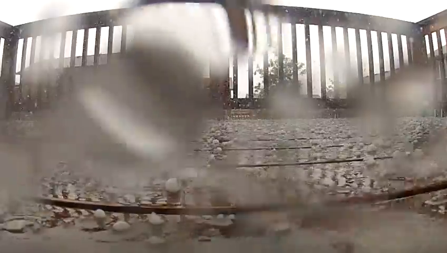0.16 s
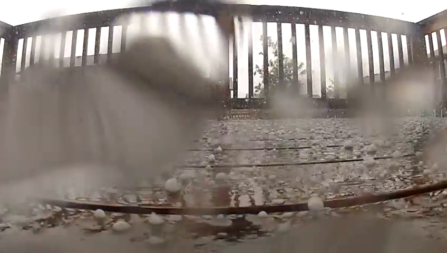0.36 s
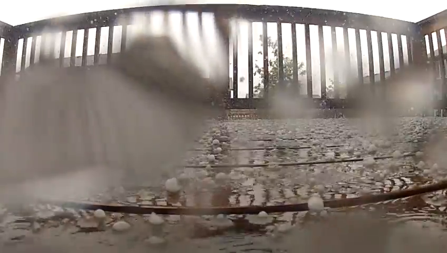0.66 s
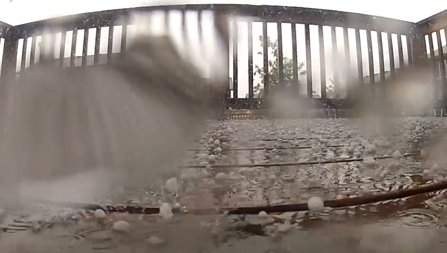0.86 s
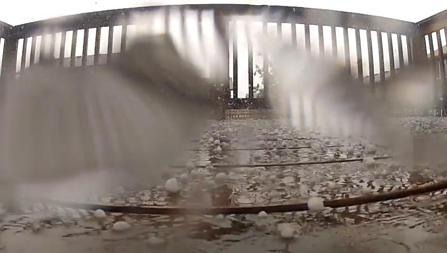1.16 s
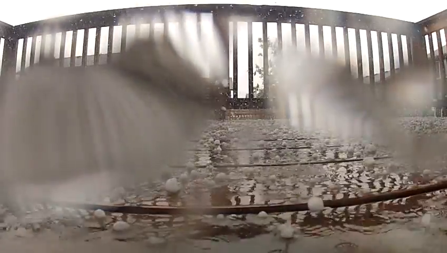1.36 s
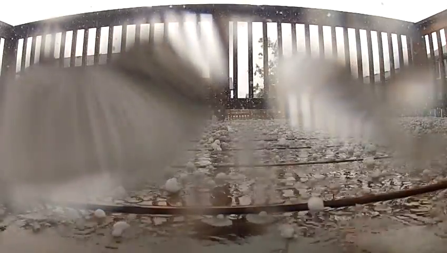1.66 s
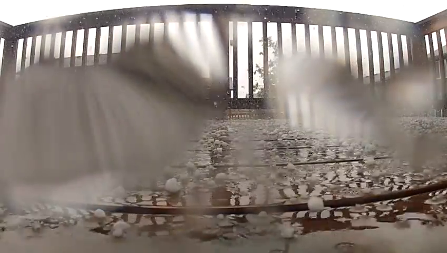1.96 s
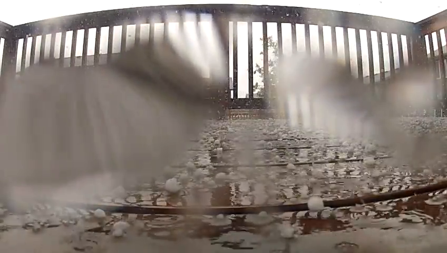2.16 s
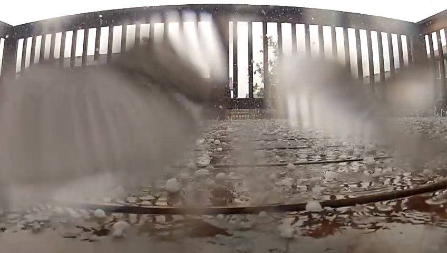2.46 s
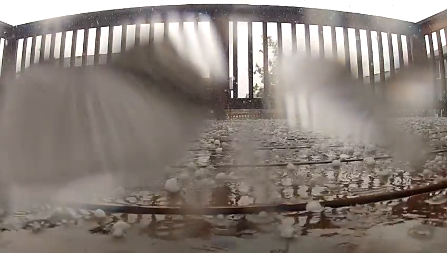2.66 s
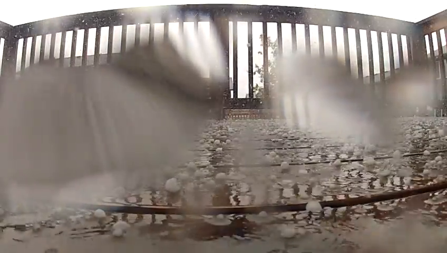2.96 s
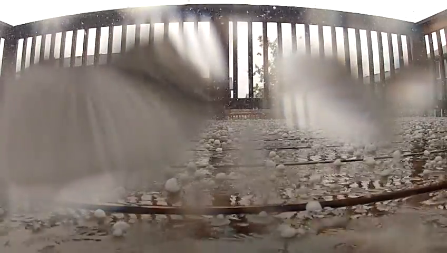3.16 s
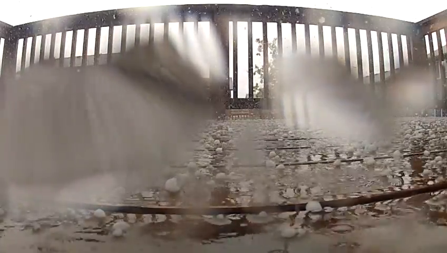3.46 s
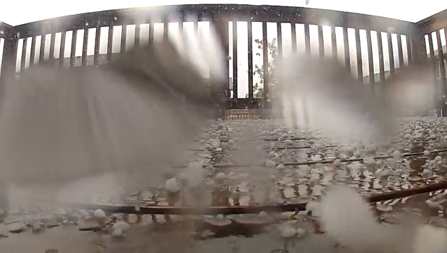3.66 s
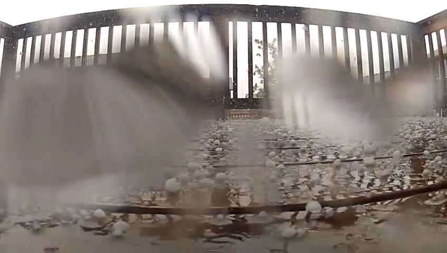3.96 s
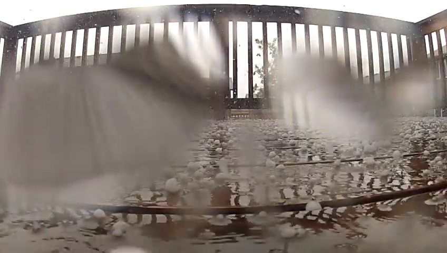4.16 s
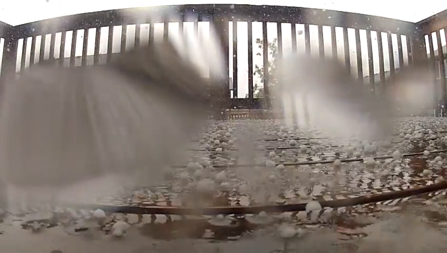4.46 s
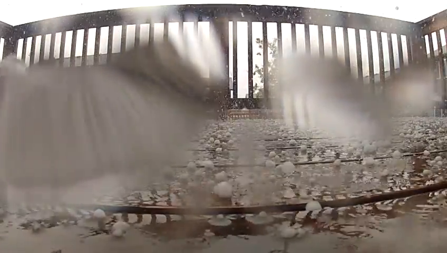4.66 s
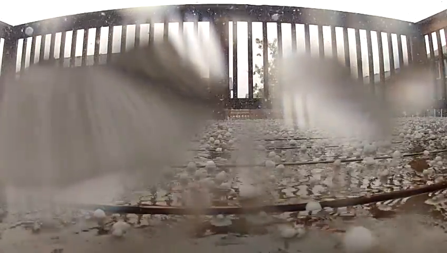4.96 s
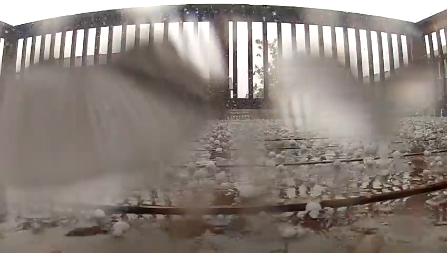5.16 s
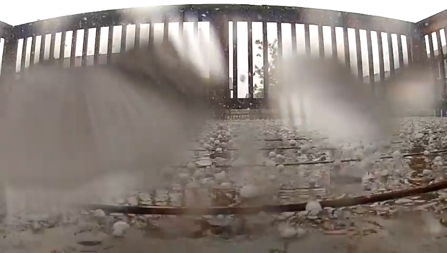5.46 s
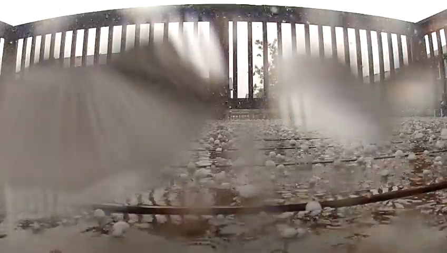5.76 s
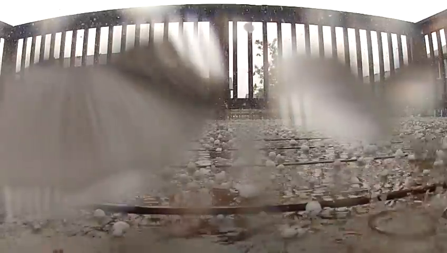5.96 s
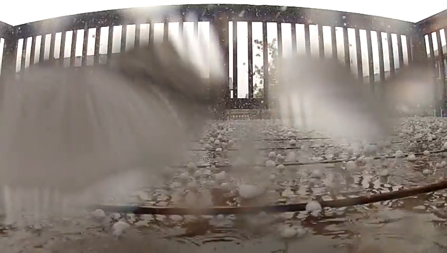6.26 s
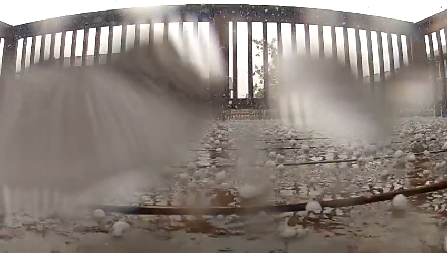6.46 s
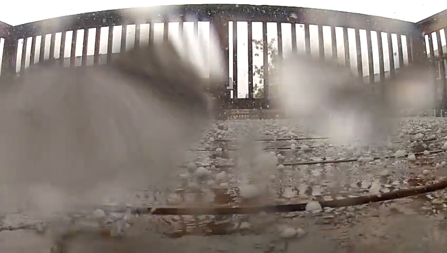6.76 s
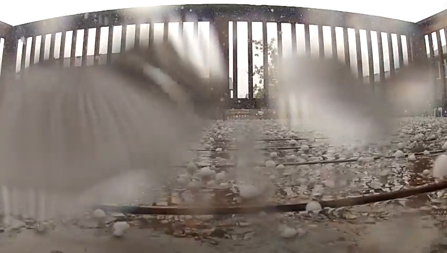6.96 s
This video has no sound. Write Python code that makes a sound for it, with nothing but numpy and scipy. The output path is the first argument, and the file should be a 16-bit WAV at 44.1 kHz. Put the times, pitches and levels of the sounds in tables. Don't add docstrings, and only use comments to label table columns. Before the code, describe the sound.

Close, gritty hailstorm on wet boards: constant rattling patter over a low hum, brittle cracks, woody knocks, and a few overloaded thumps against the microphone case.

```python
import sys
import numpy as np
from scipy import signal
from scipy.io import wavfile
from scipy.ndimage import uniform_filter1d

SR = 44100
rng = np.random.default_rng(int(sys.argv[2]) if len(sys.argv) > 2 else 0)


def ratio_of_db(decibels):
    return 10 ** (np.asarray(decibels, float) / 20)


def wrap_up_sound(samples):
    columns = np.atleast_2d(samples).T
    tamed = np.clip(columns, -1, 1)
    steps = np.round(tamed * 32767).astype(np.int16)
    wavfile.write(sys.argv[1], SR, steps)


N = 312669

# time in seconds, fall in dB, joist hum in dB.
FALL_LEVELS = [(0.0, -26, -26), (0.3, -28.5, -35.5), (0.8, -28, -32.5), (1.15, -26.5, -41),
               (1.26, -28, -27), (1.55, -28.5, -33), (1.93, -29, -38), (2.27, -28.5, -28),
               (2.8, -27.5, -36), (3.06, -28, -41.5), (3.4, -25, -23.5), (4.05, -28.5, -37),
               (4.9, -27, -33.5), (5.2, -25.5, -25), (5.57, -28.5, -36.5), (6.16, -26, -30),
               (6.65, -26, -43.5), (7.09, -24.5, -28)]
# time in seconds, peak in dB.
DULL_KNOCKS = [(0.246, -8), (0.315, -2), (0.463, -9), (0.533, -4.5), (0.562, -11), (0.577, -15),
               (1.287, -10), (1.428, 1.5), (1.654, -8), (1.757, -9), (1.812, -7), (1.911, -0.5),
               (2.186, -2.5), (2.217, -1.5), (2.6, -6), (2.674, -15), (2.961, -9), (3.522, -7.5),
               (3.954, 2), (4.057, -4.5), (4.204, -6.5), (4.355, -8), (4.723, -9), (4.917, -3),
               (5.094, -10), (5.943, -1.5), (5.984, -5.5), (6.265, -9), (6.654, -3.5), (7.057, -15)]
# time in seconds, peak in dB, loudest ring in Hz.
EDGE_CLACKS = [(0.13, -5, 2230), (0.3562, -5, 2430), (0.5775, 3, 1840), (0.712, -2, 1970),
               (0.726, -1.5, 2340), (1.196, -5.5, 2020), (1.238, -7.5, 2060), (1.329, -10, 1880),
               (1.363, 2, 1860), (1.4437, -2, 2320), (1.4594, -5.5, 1890), (1.532, -5, 1850),
               (1.901, -11, 1900), (2.07, -3.5, 1920), (2.75, -14, 1870), (3.2727, -8, 2130),
               (3.658, -9, 2170), (3.707, -10, 1680), (4.287, -16, 1820), (4.367, -5.5, 1840),
               (4.392, -0.5, 1860), (5.26, -6, 1790), (5.269, -5, 2520), (5.89, -0.5, 1870),
               (5.9066, -6, 2010), (6.136, -2.5, 1930), (6.162, -4, 1860), (6.224, -11.5, 2330),
               (6.953, -6, 2260), (7.038, -3, 1870)]
# time in seconds, peak in dB, loudest ring in Hz, ice crack in dB.
ICE_CRACKS = [(0.138, 0, 1110, -12), (0.268, 3.5, 4100, -7.5), (0.2866, -3.5, 5010, -4),
              (0.489, 4.5, 2300, -10), (0.5732, -6, 3540, -18), (0.675, -19, 977, -22),
              (0.819, -2.5, 1080, -14), (0.844, 0.5, 1030, -16), (0.969, -6.5, 680, -17),
              (1.136, -10, 2360, -7), (1.482, -6.5, 2220, -4), (1.7, -7, 2300, -10), (2.069, -9, 1180, -11),
              (2.142, -4.5, 1110, -6), (2.4142, 4, 2070, -20.5), (2.874, -4.5, 1020, -11),
              (3.009, -6, 800, -20), (3.371, -10.5, 996, -14), (3.6728, -2.5, 3300, -4),
              (3.8104, -12, 2260, -1), (4.614, -5, 1080, -6.5), (4.703, -4, 2530, -7),
              (4.811, -16, 2380, -4), (5.2, -8.5, 1810, -6), (5.421, -4.5, 1100, -13), (6.2, -10, 2470, 7),
              (6.362, -2, 3700, -14), (6.539, -5.5, 810, -24), (6.595, -9.5, 1030, -2),
              (7.026, -5, 640, -4)]
# time in seconds, peak in dB, loudest ring in Hz.
SMALL_TAPS = [(0.028, -14, 1800), (0.087, -15, 1020), (0.121, -8, 1150), (0.233, -9, 1020),
              (0.406, -12, 845), (0.509, -11, 1850), (1.101, -17, 1030), (1.2156, -8, 1870),
              (1.798, -18, 1850), (2.105, -9, 1010), (2.372, -26, 950), (2.429, -14, 1830),
              (3.384, -13, 3720), (3.4043, -13, 2310), (3.899, -12.5, 1900), (4.095, -9, 990),
              (4.181, -15, 732), (5.078, -12, 1920), (5.189, -18, 2400), (5.315, -10.5, 1340),
              (5.638, -10, 1000), (5.6442, -12, 2360), (5.749, -12, 1050), (5.7687, -14.5, 1830),
              (5.786, -19, 1420), (6.083, -12, 1000), (6.455, -18, 1060), (6.871, -13, 1020),
              (6.911, -9, 1010), (6.981, -14, 1140)]
# time in seconds, ring in dB, ring in Hz, rattle in ms, gain drop in dB.
CASE_STRIKES = [(0.973, -11, 2150, 3.1, -6.5), (0.9949, -2, 2170, 1, 12), (0.999, 20, 2250, 1.8, 15.5),
                (1.0023, 5, 2030, 2.3, 25.5), (2.7165, -1, 1100, 3.05, 8), (2.785, -5.5, 2340, 5.3, 1),
                (3.246, -21, 1100, 7.9, 0.5), (3.2484, -1, 2010, 2.6, 6), (3.2919, 4, 2235, 2.2, 13),
                (3.3223, -1.5, 2346, 3.85, 12.5), (3.4316, 0.5, 2360, 3.7, 17),
                (3.5651, 13, 2307, 3.4, 12.5), (3.7246, 0.5, 1390, 6.3, 27.5), (4.2928, -6, 3480, 4.7, 0.5),
                (4.2958, -4, 1470, 2.45, 1.5), (5.1529, 5, 2350, 5.7, 43.5), (5.5677, -2, 2320, 3.2, 3.5),
                (5.572, 10, 2240, 1.7, 5.5), (5.5820, -12, 2340, 1.26, 8), (5.665, -16, 3620, 1.6, 15),
                (5.6693, 3, 2163, 3.1, 5.5), (5.6759, -4, 1186, 6.2, 11.5), (6.7165, -6, 1720, 5.1, -4),
                (6.7189, 15, 2010, 2.46, 32)]
# time in seconds, push in ms, push in dB, rebound in dB.
AIR_THUMPS = [
    (.9964, 3.8, 14, 7),
    (2.7172, 1.1, -9, -13),
    (3.5645, 4.8, -8, -11),
    (3.7248, 1.6, -5, -11),
    (5.1524, 6.2, 2, 1.5),
    (6.7174, 3.8, 15, 8.5),
]
# frequency in Hz, width in Hz, level in dB.
JOIST_MODES = [(75.5, 12, 4)]
# frequency in Hz, width in Hz, level in dB.
BOARD_MODES = [(199, 17.2, -2), (252.3, 48.6, 4), (306, 44.4, 4), (411, 148, 4)]
# frequency in Hz, width in Hz, level in dB.
CASE_MODES = [(744, 152, -6.5), (1060, 134, -3), (1316, 71, -13), (1870, 160, -5), (2350, 225, -3),
              (3283, 460, -11), (3644, 237, -9), (5010, 810, -8.5)]


def ring(x, hz, width):
    pole = np.exp(-np.pi * width / SR + 2j * np.pi * hz / SR)
    return signal.lfilter([1], [1, -pole], x).imag


def impulses(s, size):
    return np.bincount(np.clip((s * SR).astype(int), 0, N - 1), size, N)


def unit(x):
    return x / np.sqrt(np.mean(x ** 2))


def high_pass(x, order, hz):
    return signal.sosfilt(signal.butter(order, hz, "high", fs=SR, output="sos"), x)


def walk(rate):
    k = int(SR / rate)
    steps = np.repeat(rng.standard_normal(400), k)[:N]
    return unit(uniform_filter1d(steps, k))


def clumps():
    depth_db, clump_ms = 2.5, 12
    s = np.array([row[0] for row in DULL_KNOCKS + EDGE_CLACKS + ICE_CRACKS + SMALL_TAPS])
    k = int(clump_ms * SR / 1e3)
    density = uniform_filter1d(uniform_filter1d(impulses(s, np.ones(len(s))), k), 2 * k)
    return depth_db * np.tanh(k * density * 2)


def hits(s, size, body, colour_db, contact_ms):
    fade = np.exp(-1e3 / (contact_ms * SR))
    out = 0
    for (hz, width, db), extra_db in zip(body, colour_db.T):
        envelope = signal.lfilter([1], [1, -2 * fade, fade ** 2], impulses(s, size * ratio_of_db(db + extra_db)))
        out = out + ring(envelope * rng.standard_normal(N), hz, width)
    return out


def shower(body, count, spread_db, colour_db, contact_ms):
    s = rng.uniform(0, N / SR, count)
    size = ratio_of_db(spread_db * rng.exponential(1, count))
    colours_db = colour_db * rng.standard_normal((count, len(body)))
    return unit(hits(s, size, body, colours_db, contact_ms))


def joist():
    nudge = np.cumsum(ring(rng.standard_normal(N), 2.4, 38))
    phase = 2 * np.pi * 74.8 * np.arange(N) / SR + 3 * unit(nudge - nudge.mean())
    note = np.sqrt(2) * np.sin(phase)
    return note + ratio_of_db(-14) * shower(JOIST_MODES, count=3000, spread_db=2, colour_db=0, contact_ms=4)


def board_drum(fall_db, hum_db):
    level_db = fall_db.mean() + 1.5 + 0.72 * (fall_db - fall_db.mean())
    level_db = level_db + 0.13 * (hum_db - hum_db.mean()) + 0.5 * walk(16)
    drum = shower(BOARD_MODES, count=9000, spread_db=1.7, colour_db=3.5, contact_ms=0.82)
    return ratio_of_db(level_db + 0.5) * drum


def case_patter(fall_db):
    patter = shower(CASE_MODES, count=1500, spread_db=1.0, colour_db=0.0, contact_ms=2.67)
    pellets = shower(CASE_MODES, count=2500, spread_db=3.0, colour_db=5.5, contact_ms=.7)
    rain = shower(CASE_MODES, count=30000, spread_db=3.5, colour_db=-3.5, contact_ms=0.18)
    stones = shower(CASE_MODES, count=220, spread_db=2.5, colour_db=5.0, contact_ms=1.47)
    fall = patter + ratio_of_db(-4.5) * pellets + ratio_of_db(-4) * rain + ratio_of_db(-11.0) * stones
    flurries_db = 1.1 * walk(22)
    return ratio_of_db(fall_db - 1.0) * fall * ratio_of_db(flurries_db + clumps() - 1.0)


def dense_fall():
    s, *columns = np.transpose(FALL_LEVELS)
    fall_db, hum_db = (np.interp(np.arange(N) / SR, s, column) for column in columns)
    deck = case_patter(fall_db) + board_drum(fall_db, hum_db) + ratio_of_db(hum_db) * joist()
    return high_pass(deck, 4, 53)


def gain():
    recover_ms, grab_ms = 64.7, 2
    s, _, _, ms, drop_db = np.transpose(CASE_STRIKES)
    slow, fast = np.exp(-1e3 / (np.array([recover_ms, grab_ms]) * SR))
    creep_db = signal.lfilter([1], [1, -slow], impulses(s + 0.1 * ms / 1e3, drop_db))
    return ratio_of_db(-signal.lfilter([1 - fast], [1, -fast], creep_db))


def air_thumps():
    out, t = np.zeros(N), np.arange(SR // 20) / SR * 1e3
    for s, ms, push_db, back_db in AIR_THUMPS:
        push = -ratio_of_db(push_db) * np.sin(np.pi * np.clip(t / ms, 0, 1)) ** .5
        after = np.clip(t - ms, 0, None)
        rebound = ratio_of_db(back_db) * (1 - np.exp(-after / .5)) * np.exp(-after / 3.4)
        i = int(s * SR)
        out[i:i + len(t)] += push + rebound
    return out


def case_strikes():
    wall_hz, onset_ms, fade_ms, capsule_limit = 2430, .6, 1.03, .95
    out, t = np.zeros(N), np.arange(SR // 40) / SR * 1e3
    for s, db, hz, ms, _ in CASE_STRIKES:
        wobble, grit = rng.standard_normal((2, len(t)))
        share = np.clip(.25 + .3 * abs(np.log2(hz / wall_hz)) + 0.043 * ms, 0, .72)
        shape = np.clip(t / onset_ms, 0, 1) * np.where(t < ms, 1, 0.22 * np.exp(-(t - ms) / fade_ms))
        tone = np.sin(2 * np.pi * hz * t / 1e3 + 0.9 * unit(ring(wobble, 105, 250)))
        splinter = unit(sum(ratio_of_db(0.23 * d) * ring(grit, f, 0.6 * w) for f, w, d in CASE_MODES[3:]))
        rattle = np.sqrt(1 - share ** 2) * tone + 1.42 * share * splinter
        i = int((s - 3e-4) * SR)
        out[i:i + len(t)] += capsule_limit * np.tanh(ratio_of_db(db + 0.5) * shape * rattle)
    return out


def stone_crunch(t):
    skid_db, skid_ms = -37, 8
    grit = rng.standard_normal(len(t))
    crunch = grit * (t * np.exp(-t / .8)) ** 2
    crunch[SR // 2500] += .8
    return crunch + ratio_of_db(skid_db) * grit[::-1] * np.clip(t / 2, 0, 1) * np.exp(-t / skid_ms)


def wall_clack(crunch, hz, crack_db):
    steep = 1.7
    mode_hz, _, mode_db = np.transpose(CASE_MODES)
    near = np.exp(-(np.log(mode_hz / hz) / 0.12) ** 2)
    colour_db = mode_db + near * (1.5 - mode_db) + 1.2 * rng.standard_normal(len(CASE_MODES))
    colour_db = colour_db + (mode_hz > 2800) * (crack_db + 15)
    clack = 0
    for db, (f, w, _) in zip(colour_db, CASE_MODES):
        clack = clack + ratio_of_db(db) * w * ring(ring(crunch, f, steep * w), f, steep * w)
    return high_pass(clack, 2, 500)


def single_stones():
    dull_hz, dull_crack_db, clack_crack_db = 1055, -20, -18.5
    out, t = np.zeros(N + SR), np.arange(SR // 25) / SR * 1e3
    stones = [(s, db, dull_hz, dull_crack_db) for s, db in DULL_KNOCKS]
    stones += [(*row, clack_crack_db) for row in EDGE_CLACKS + SMALL_TAPS]
    stones += ICE_CRACKS
    thud = sum(ratio_of_db(d) * ring(t * np.exp(-t / 0.93), f, w) for f, w, d in BOARD_MODES)
    thud = thud / abs(thud).max()
    for s, db, hz, crack_db in stones:
        clack = wall_clack(stone_crunch(t), hz, crack_db)
        i = int((s - 4e-4) * SR)
        out[i:i + len(t)] += ratio_of_db(db - 6.0) * (clack / abs(clack).max() + ratio_of_db(-27.0) * thud)
    return out[:N]


def scene():
    return (gain() * dense_fall() + air_thumps() + case_strikes() + single_stones())[None]


def roll_off(x):
    return signal.sosfilt(signal.butter(12, 16330, fs=SR, output="sos"), x)


def record(dry):
    converter_hz, hold, full_scale = 12000, 4, 1.07
    samples = signal.resample_poly(dry, converter_hz, SR, axis=1)
    held = np.repeat(np.clip(samples, -full_scale, full_scale), hold, axis=1)
    wet = signal.resample_poly(held, SR, hold * converter_hz, axis=1)[:, :N]
    wet = np.pad(wet, ((0, 0), (0, N - wet.shape[1])))
    wet = signal.sosfiltfilt(signal.ellip(6, .2, 22, 15050, fs=SR, output="sos"), wet)
    wet = np.clip(wet, -1, 1)
    wet = signal.sosfiltfilt(signal.ellip(8, .1, 30, 16300, fs=SR, output="sos"), wet)
    return roll_off(wet)


dry = scene()
out = record(dry)
wrap_up_sound(out)
```